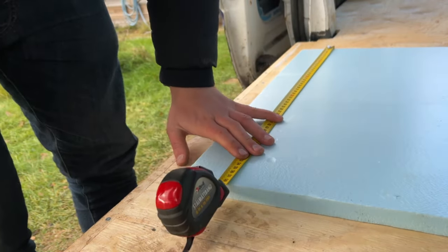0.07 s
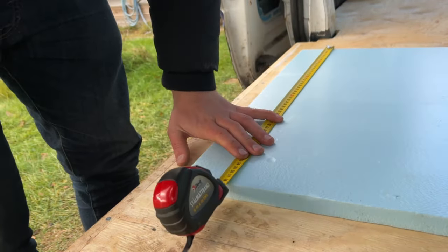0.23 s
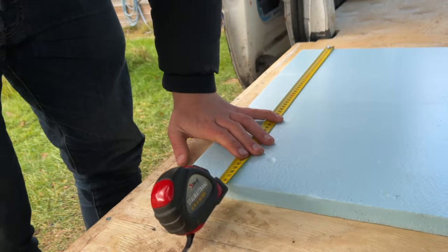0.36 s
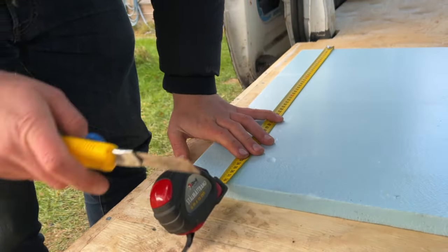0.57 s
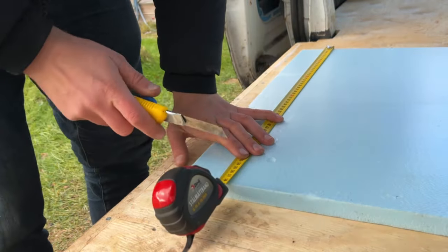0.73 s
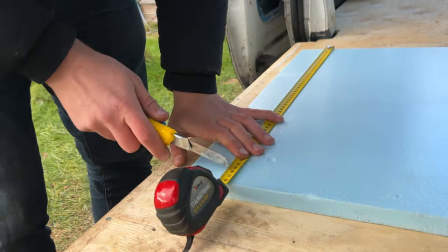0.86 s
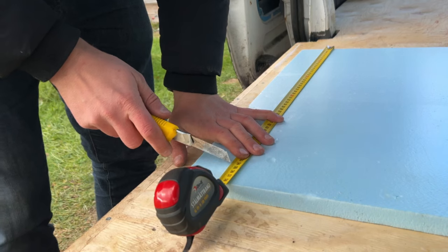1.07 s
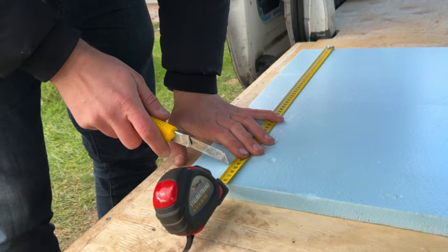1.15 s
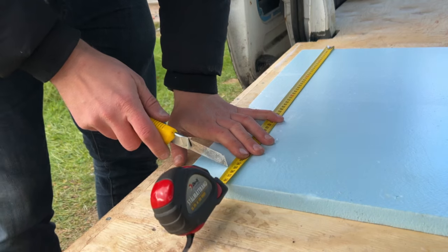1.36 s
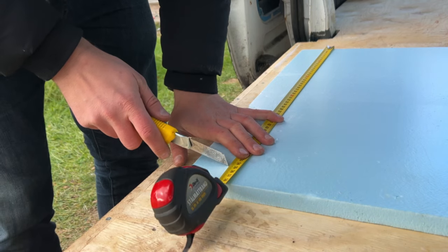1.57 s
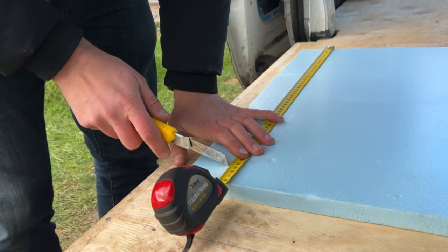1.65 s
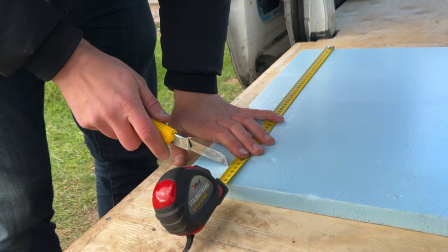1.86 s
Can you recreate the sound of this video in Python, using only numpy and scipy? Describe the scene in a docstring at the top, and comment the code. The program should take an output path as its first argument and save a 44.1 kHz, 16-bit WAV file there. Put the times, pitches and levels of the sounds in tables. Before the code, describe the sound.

A utility knife clatters as it is dragged off a wooden bench with dull knocks and a sleeve rustle. Its blade slides out in sharp clicks, then ticks faintly against a tape measure, close up in quiet outdoor air.

```python
"""A loose blade clatters in its plastic handle as a snap-off utility knife is dragged off a plywood bench,
outdoors and close to the microphone. The slider clicks out over its detents, a sleeve rustles, and the
blade ticks lightly against a tape measure. Hands bump the bench and a foam board.
Nearby surfaces give a short echo; faint outdoor air lies behind it all."""
import sys
import numpy as np
from scipy import signal
from scipy.fft import rfft, irfft
from scipy.io import wavfile
from scipy.ndimage import uniform_filter1d

SR = 44100
rng = np.random.default_rng(int(sys.argv[2]) if len(sys.argv) > 2 else 0)


def generate_wav(sig):
    """Save sig (samples, or channels by samples) to the path in sys.argv[1] as 16-bit PCM at SR."""
    pcm = np.round(np.clip(np.atleast_2d(sig).T, -1, 1) * 32767).astype(np.int16)
    wavfile.write(sys.argv[1], SR, pcm)


N = 83790

# Each sound's spectrum at the microphone. Each row: frequency in Hz, relative level in dB.
AIR_SPECTRUM = [(50, -4.5), (80, 6.5), (125, -2), (180, 0.5), (260, -7.5), (355, -3.5), (470, -7),
                (750, -4), (1100, -6), (1450, -11), (1800, -23), (2300, -16.5), (3150, -30), (4300, -22.5),
                (6500, -33), (10000, -48), (15500, -45.5)]
RUSTLE_SPECTRUM = [(200, -6), (1100, 6.5), (1800, -12.5), (2400, -6), (3100, -12.5), (4200, -0.5),
                   (6000, -3.5), (10000, -5.5), (15500, -11)]
ECHO_SPECTRUM = [(100, -10), (1000, 0.5), (4000, 2.5), (9000, 0.5), (15000, -6.5)]
BENCH_SPECTRUM = [(200, -9.5), (260, -14.5), (355, 3.5), (450, -3), (640, 1.5), (900, -4.5), (1130, -2),
                  (1450, -14), (1850, -22.5), (2400, -19.5), (3200, -28.5), (8000, -45), (15000, -70)]
TIP_SPECTRUM = [(400, -2), (1100, -10.5), (2000, -23), (3200, -24), (4050, 4), (5000, -15.5), (7000, -7),
                (9000, -20.5), (11000, -28.5), (13500, -25.5), (15500, -23.5)]
SLIDER_SPECTRUM = [(150, -30.5), (650, -36), (1020, -8), (1350, -30), (1800, -28), (2250, -8.5),
                   (3100, -16.5), (3700, -4), (4700, 2.5), (5700, -7), (7200, 0.5), (8100, -5),
                   (9500, -0.5), (12500, -9.5), (15500, -15)]
CLATTER_SPECTRUM = [(150, -19), (600, -21.5), (1080, -8), (1400, -13), (1850, -12.5), (2500, -2),
                    (3050, -14.5), (3650, 2.5), (4700, 1.5), (5400, -2.5), (6200, 4), (7500, 3.5),
                    (8400, -1.5), (9500, 2.5), (12500, -7.5), (15500, -14.5)]
# Rubbing of hand and sleeve, and of the handle on wood. Each row: time in seconds, level in dB.
RUSTLE_LEVELS = [(0, -62.5), (.12, -64), (.17, -66.5), (.205, -47), (.235, -46), (.33, -47.5), (.5, -55.5),
                 (.62, -53), (.78, -53.5), (.91, -58.5), (.98, -75), (1.1, -85), (1.57, -79), (1.65, -67.5),
                 (1.73, -83.5), (1.9, -86)]
DRAG_LEVELS = [(.15, -88), (.19, -67.5), (.23, -65), (.26, -34.5), (.295, -45.5), (.33, -49), (.37, -46.5),
               (.41, -52)]
# Bumps of hands and legs. Each row: start in seconds, level in dB, length in seconds, pitch in Hz.
BODY_BUMPS = [(.17, -49, 0.068, 148), (.225, -49, 0.13, 157.4), (.17, -60.5, .26, 82.6),
              (.56, -61, 0.079, 83.8), (1.178, -55.5, 0.048, 79.8), (1.685, -57, 0.091, 85),
              (1.76, -60.5, 0.061, 100.2), (1.825, -52, 0.077, 85), (1.845, -54, 0.042, 164.5)]
# Knocks on the bench. Each row: start in seconds, level in dB, contact in seconds, tilt in dB per octave.
BENCH_KNOCKS = [(0.127, -55, .003, 2), (0.167, -46.5, 0.0071, 0), (.238, -47, .01, 5),
                (.255, -40, .008, -10), (0.27, -45, 0.0068, -1), (.307, -44, .008, -7),
                (0.3384, -33.5, 0.0081, -4), (.362, -44.5, .006, 1), (0.539, -52.5, .002, 4),
                (.896, -53.5, 0.033, -3), (1.281, -49, 0.013, 2.5), (1.312, -57.5, 0.016, 1.5)]
# The blade tip meeting the tape. Each row: start in seconds, level in dB, chatter in seconds,
# body in dB, tilt in dB per octave.
TIP_TOUCHES = [(1.244, -65, .012, -2.5, 7), (1.28, -50.5, 0.0016, 12.5, -3), (1.546, -45.5, .0015, 0.5, 0),
               (1.627, -61.5, .002, -5, 6.5), (1.657, -56, 0.004, 8.5, -4.5), (1.683, -63, .002, -6.5, -4),
               (1.875, -57, .002, -7, -6)]
# The slider passing its detents, and the loose blade hitting the handle. Each row: start in seconds,
# level in dB, chatter in seconds, handle body in dB, tilt in dB per octave, ring in dB, resonance in Hz.
SLIDER_CLICKS = [(.441, -43, .006, -11, -11, -10, 2300), (.447, -40.5, 0.0033, 0.5, -8.5, -11.5, 4800),
                 (.451, -26, 0.0039, 18, 5, -21, 6100), (.4645, -25, 0.0024, 12.5, 0, -19, 4960),
                 (.469, -26, 0.005, 1, 3, -23, 4940), (.565, -38, 0.0057, 19.5, 1, -21, 6530),
                 (.594, -45, .003, -8.5, 0, -25, 4200), (.603, -35, 0.0025, -3.5, -4.5, -21.5, 4460),
                 (.637, -41, 0.0057, -10, -11.5, -21.5, 5060), (.656, -39.5, 0.0023, -7, -5, -22, 9200),
                 (.660, -20, 0.0014, -11.5, -6.5, -23.5, 4050), (.669, -21, 0.0092, 10, 0.5, -26.5, 7300),
                 (.686, -23.5, 0.0045, 4.5, -0.5, -26, 7150), (.6895, -17.5, 0.003, 5, 0.5, -26, 4500),
                 (.6995, -31, 0.00054, 0, -7.5, -20, 4400), (.729, -40.5, 0.0087, 18.5, 1, -19, 8600),
                 (.753, -44, .003, -11, -10, -5.5, 4520), (.834, -54, 0.007, -3, -9, -19, 3970),
                 (.8695, -48, 0.003, -5.5, -4.5, -23, 4410), (.884, -51.5, 0.0025, -6.5, -8, -19.5, 4350),
                 (.9035, -39, 0.00059, -19, -12.5, -20, 4110), (.9225, -44.5, .001, -16.5, -14, -18, 4200)]
CLATTER_CLICKS = [(.1665, -51.5, 0.00089, 8, 3, -26.5, 10400), (.2375, -18, 0.0053, -8.5, -1.5, -21, 7750),
                  (.2765, -29, 0.0055, -12, -1, -15, 7200), (.2845, -19.5, 0.00093, -10, 0, -13, 4530),
                  (.309, -40.5, 0.0065, -7, -7, -34, 9500), (.348, -26.5, .002, -3, 2, -16.5, 6700),
                  (.3518, -18.5, 0.0033, -8, 0.5, -20.5, 6930), (.359, -27.5, .003, 7, -2, -14, 7500),
                  (.3638, -24.5, .001, 5.5, -5, -20.5, 6900),
                  (.3755, -22.5, 0.0043, 13.5, -0.5, -14.5, 9500),
                  (.381, -22, 0.0035, 10.5, 9.5, -11, 9400), (.3925, -23.5, 0.0026, 3.5, -3, -20.5, 6100),
                  (.3968, -19, .002, 5, 4.5, -15, 6040), (.417, -31, .004, 7, -1, -8, 2480)]
# Modes of plywood top, plastic handle and steel blade. Each row: frequency in Hz, relative level in dB,
# seconds to fall 60 dB.
BENCH_MODES = [(185, -6, 0.2), (346.7, 2, .17), (515, -5.5, .15), (640, -3, 0.086), (729, -2, .2),
               (940, -7.5, .15), (1120, -7.5, 0.1398)]
HANDLE_MODES = [(952, -5, 0.079), (1117, -1.5, 0.12), (2340, -4, .07), (2540, -2, .09), (2578, -5.5, .1)]
BLADE_MODES = [(3510, -6, .1), (4650, -6.5, 0.26), (4750, -6, 0.2), (6440, -0.5, .12), (6200, -4, .12),
               (6750, -6, .12), (6500, -5, .12), (7070, -2, 0.15), (6600, -6.5, .13), (7525, -3.5, .1),
               (7400, -5.5, .1), (9297, -3, .13)]


def undb(db):
    """Decibels to gain."""
    return 10 ** (np.asarray(db) / 20)


def unit(x):
    """Scale to rms 1."""
    return x / np.sqrt(np.mean(x ** 2))


def add(out, start, x):
    """Mix x into out from a start in seconds."""
    i = max(int(start * SR), 0)
    out[i:i + len(x)] += x[:max(N - i, 0)]


def fader(levels):
    """Gain over time through points of seconds and dB."""
    return undb(np.interp(np.arange(N) / SR, *np.array(levels).T))


def colour(x, spectrum, body_db=0, tilt_db=0, peak_hz=None, size=4096):
    """Filter at unit power through a spectrum, with low cut, body shelf, tilt and optional resonance."""
    hz = np.maximum(np.fft.rfftfreq(size, 1 / SR), 10)
    point_hz, point_db = np.array(spectrum).T
    outline = np.interp(np.log(hz), np.log(point_hz), point_db)
    low_cut = 12.5 * np.minimum(np.log2(hz / point_hz[0]), 0)  # 12.5 dB per octave
    peak = 6.5 / (1 + ((hz - peak_hz) / 240) ** 2) if peak_hz else 0
    shelf = body_db / (1 + (hz / 3000) ** 4)
    tilt = tilt_db * np.log2(np.maximum(hz, 400))
    gain = unit(undb(outline + low_cut + peak + shelf + tilt))
    cepstrum = irfft(np.log(gain))
    cepstrum[1:size // 2] *= 2  # minimum phase: nothing sounds before the blow
    cepstrum[size // 2 + 1:] = 0
    impulse = irfft(np.exp(rfft(cepstrum)))
    return signal.fftconvolve(x, impulse)[:len(x)]


def contact(hold, t60, rough_db, size=12000):
    """A burst of tiny uneven impacts that holds briefly and dies away."""
    t = np.arange(size) / SR
    envelope = undb(-60 * np.maximum(t - hold, 0) / t60)
    noise = rng.standard_normal(size)
    roughness = np.repeat(rng.standard_normal(size), SR // 2000)[:size]  # half-millisecond steps
    burst = envelope * noise * undb(rough_db * roughness)
    return unit(burst) * np.sqrt(np.mean(envelope ** 2))


def ring(modes, detune=0.001, size=12000):
    """Decaying modes; each blow lands elsewhere and shifts them slightly."""
    t = np.arange(size) / SR
    hz, db, t60 = np.array(modes).T[:, :, None]
    shift, polarity = rng.standard_normal((2, len(hz), 1))
    waves = np.sin(2 * np.pi * hz * (1 + detune * shift) * t) * np.sign(polarity)
    decay = undb(-60 * t / t60)
    return (undb(db) * waves * decay).sum(axis=0) / np.sqrt(np.sum(undb(db) ** 2))


def outdoor_air(level_db):
    """The open air behind the bench: a faint, steady, low wash of noise."""
    return undb(level_db) * unit(colour(rng.standard_normal(N), AIR_SPECTRUM))


def nearby_echo(x, level_db, delay_s=0.004, rise_s=0.002, t60=0.13):
    """Short diffuse reflections reaching the microphone from the bench and things nearby."""
    t = np.maximum(np.arange(SR // 2) / SR - delay_s, 0)
    envelope = (1 - np.exp(-t / rise_s)) * undb(-60 * t / t60)
    tail = colour(rng.standard_normal(len(t)) * envelope, ECHO_SPECTRUM)
    tail /= np.sqrt(np.sum(tail ** 2))
    return undb(level_db) * signal.fftconvolve(x, tail)[:N]


def sleeve_rustle(rough_db):
    """Fine, slightly grainy friction of skin and cloth."""
    grain = unit(uniform_filter1d(rng.standard_normal(N), size=150))
    friction = undb(rough_db * grain) * rng.standard_normal(N)
    return unit(colour(friction, RUSTLE_SPECTRUM)) * fader(RUSTLE_LEVELS)


def body_bumps(band_ratio):
    """Soft thuds of hands and legs: each a narrow band of rumble that swells and fades."""
    out = np.zeros(N)
    for start, db, length, hz in BODY_BUMPS:
        band = signal.butter(2, [hz / band_ratio, hz * band_ratio], "band", fs=SR, output="sos")
        n = int(length * SR)
        rumble = signal.sosfilt(band, rng.standard_normal(N))[-n:]
        add(out, start, undb(db) * unit(rumble * np.hanning(n)))
    return out


def bench_knocks(t60, rough_db, ring_db=-0.5):
    """Dull blows set the plywood top ringing."""
    out = np.zeros(N)
    for start, db, hold, tilt_db in BENCH_KNOCKS:
        blow = colour(contact(hold, t60, rough_db), BENCH_SPECTRUM, tilt_db=tilt_db)
        add(out, start, undb(db) * (blow + undb(ring_db) * ring(BENCH_MODES)))
    return out


def handle_drag(catches_per_s, scatter_db):
    """The sliding handle catches at random on the grain of the plywood."""
    t = np.arange(N) / SR
    catches = (rng.random(N) < catches_per_s / SR) * rng.choice([-1, 1], N)
    strength = undb(scatter_db * rng.standard_normal(N))
    sliding = (t > DRAG_LEVELS[0][0]) & (t < DRAG_LEVELS[-1][0])
    return unit(colour(catches * strength, BENCH_SPECTRUM)) * fader(DRAG_LEVELS) * sliding


def tip_ticks(t60, rough_db):
    """Little ticks and scrapes of the blade tip on the tape measure."""
    out = np.zeros(N)
    for start, db, hold, body_db, tilt_db in TIP_TOUCHES:
        tick = colour(contact(hold, t60, rough_db), TIP_SPECTRUM, body_db, tilt_db)
        add(out, start, undb(db) * tick)
    return out


def knife_clicks(clicks, spectrum, t60, rough_db, handle_db=-7.5):
    """Steel chatters against plastic, then blade and handle ring on."""
    out = np.zeros(N)
    for start, db, hold, body_db, tilt_db, ring_db, peak_hz in clicks:
        crack = colour(contact(hold, t60, rough_db), spectrum, body_db, tilt_db, peak_hz)
        ringing = ring(BLADE_MODES) + undb(handle_db + body_db) * ring(HANDLE_MODES)
        add(out, start, undb(db) * (crack + undb(ring_db) * ringing))
    return out


def scene():
    """One microphone at the bench: knife and wood up close with their echo, over handling and air."""
    clatter = knife_clicks(CLATTER_CLICKS, CLATTER_SPECTRUM, t60=0.03, rough_db=-1.7)
    slider = knife_clicks(SLIDER_CLICKS, SLIDER_SPECTRUM, t60=0.02, rough_db=1.1)
    ticks = tip_ticks(t60=0.016, rough_db=3)
    knocks = bench_knocks(t60=0.06, rough_db=1.0)
    drag = handle_drag(catches_per_s=1100, scatter_db=1.5)
    close = clatter + slider + ticks + knocks + drag
    air = outdoor_air(level_db=-60.5)
    echo = nearby_echo(close, level_db=-13)
    handling = body_bumps(band_ratio=1.2) + sleeve_rustle(rough_db=1.5)
    return (air + echo + handling + close)[None]


def record(dry, top_hz=15600):
    """The recorder cuts the highest treble steeply."""
    low_pass = signal.ellip(10, 0.2, 75, top_hz, fs=SR, output="sos")
    return signal.sosfilt(low_pass, dry)


dry = scene()
out = record(dry)
generate_wav(out)
```